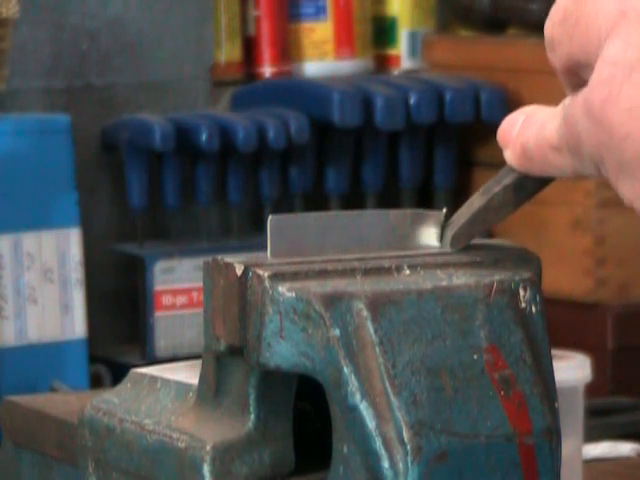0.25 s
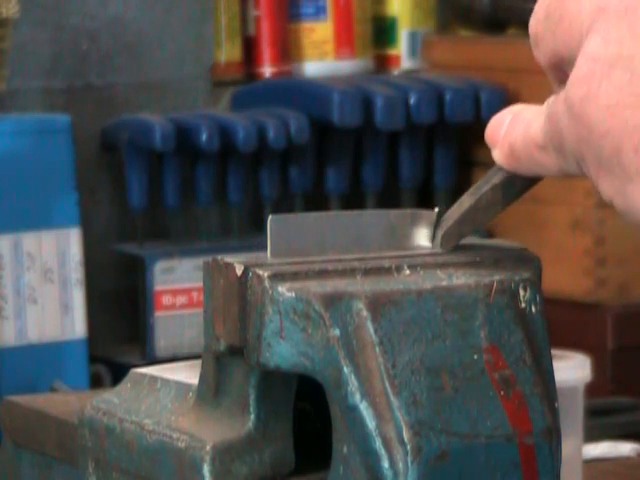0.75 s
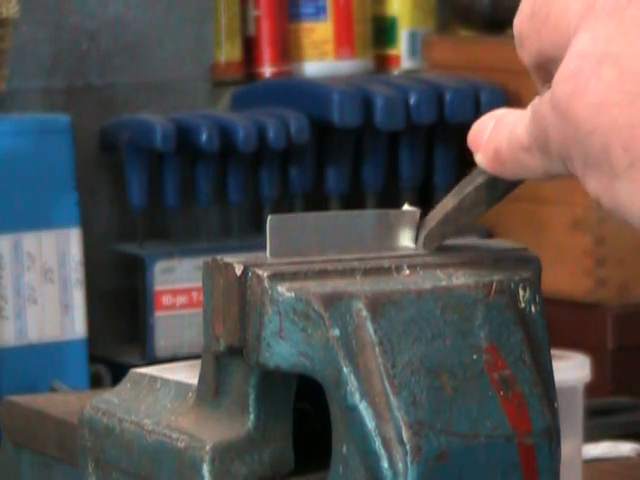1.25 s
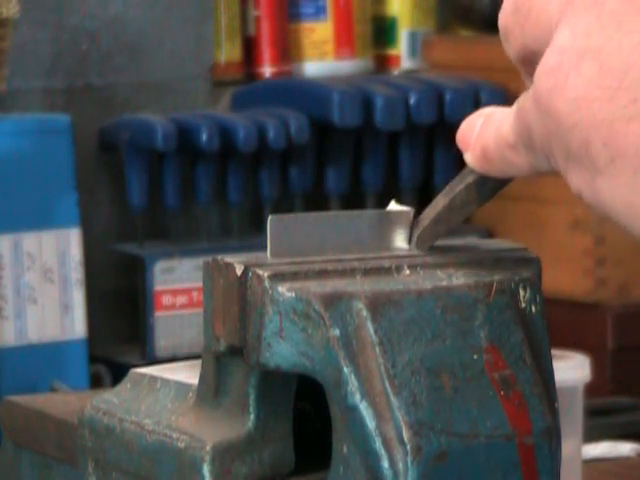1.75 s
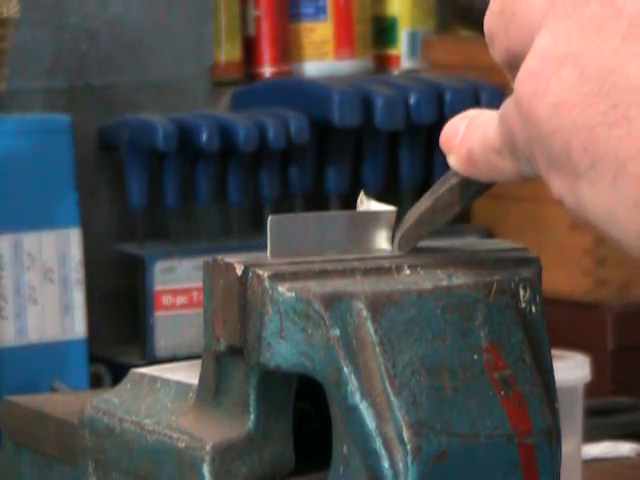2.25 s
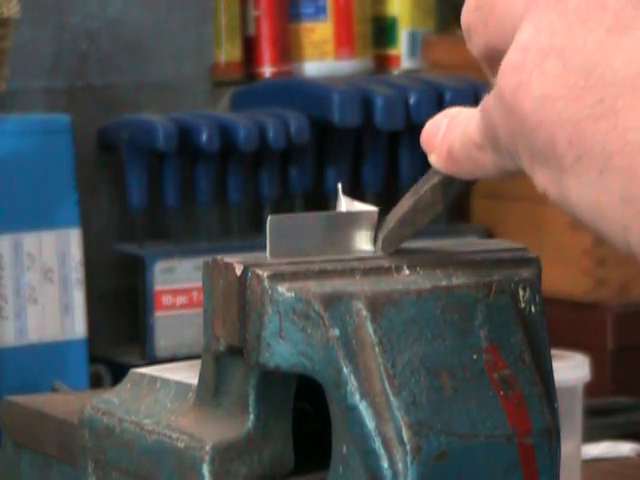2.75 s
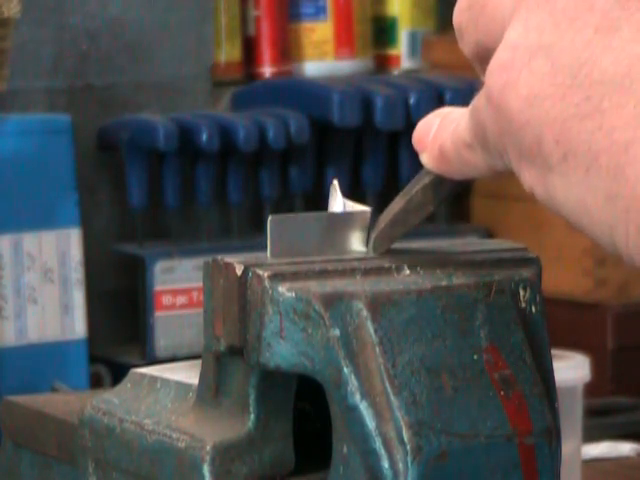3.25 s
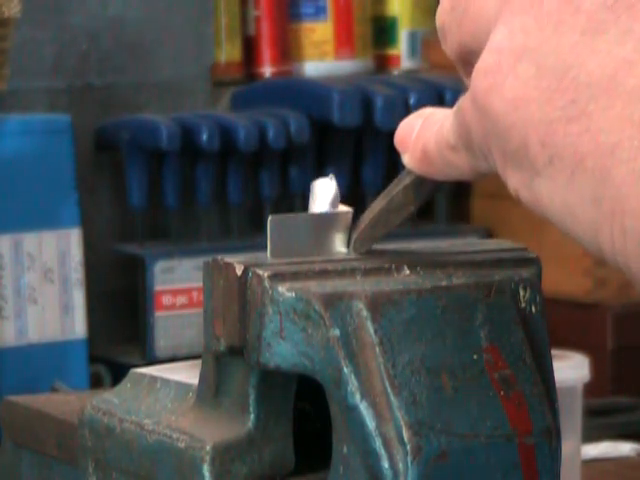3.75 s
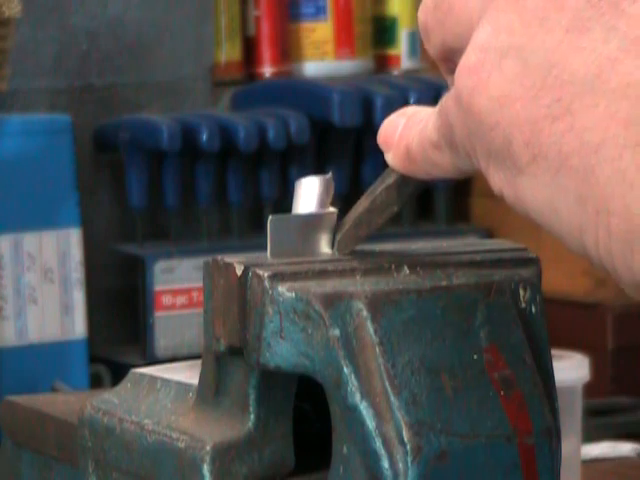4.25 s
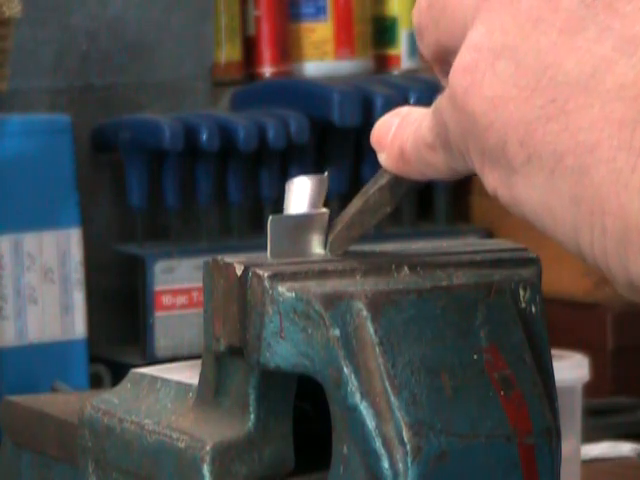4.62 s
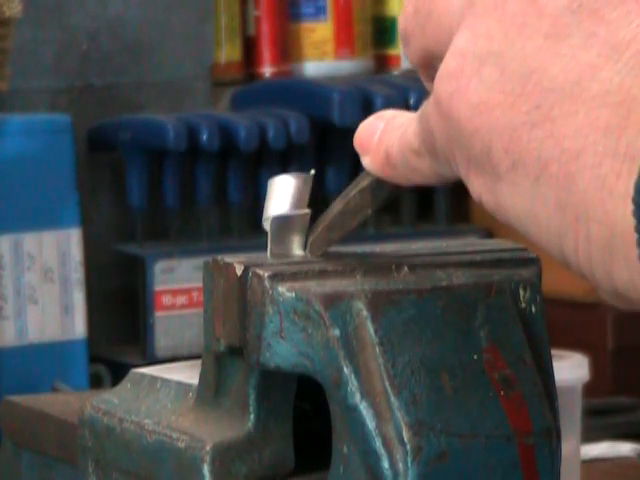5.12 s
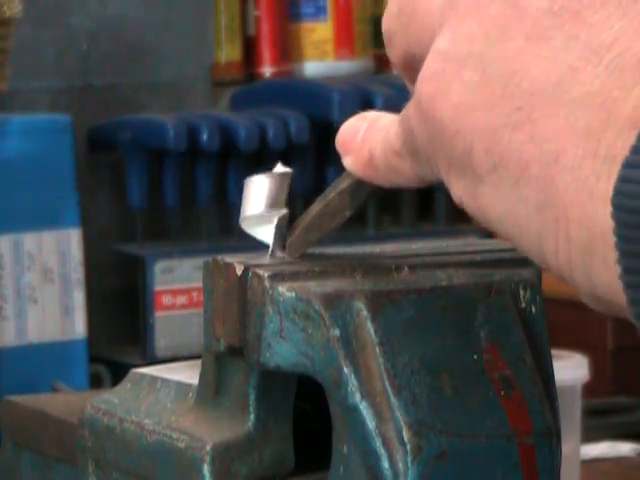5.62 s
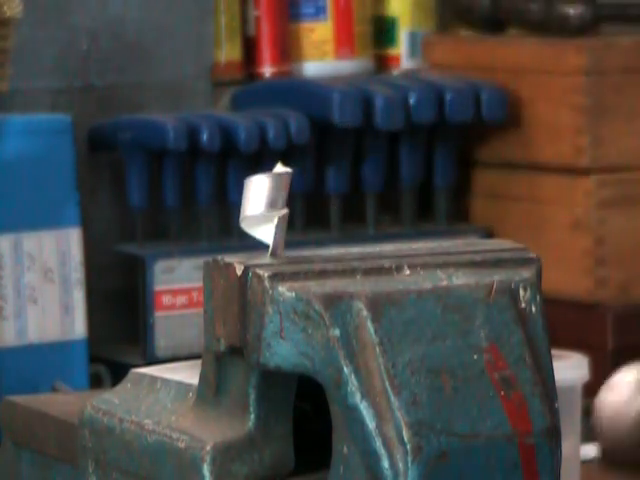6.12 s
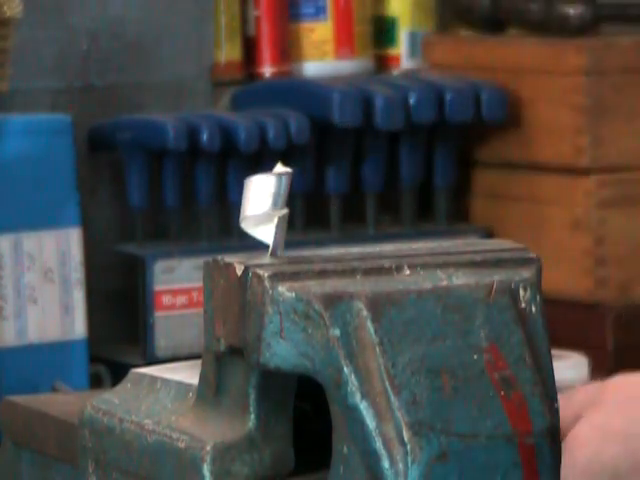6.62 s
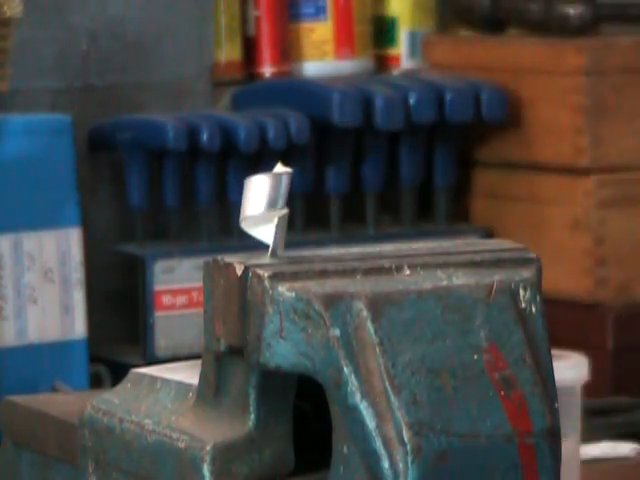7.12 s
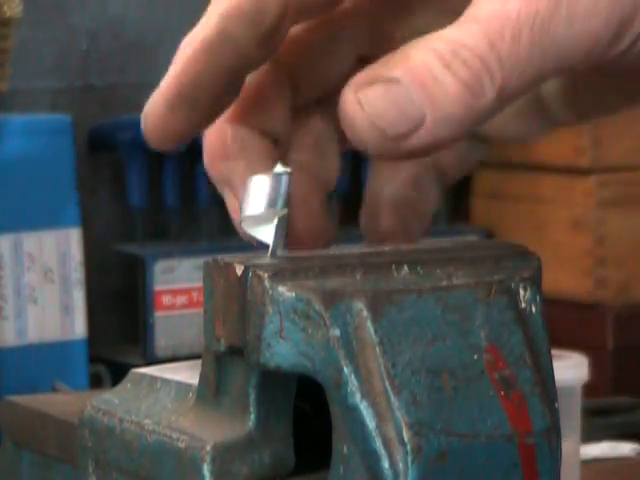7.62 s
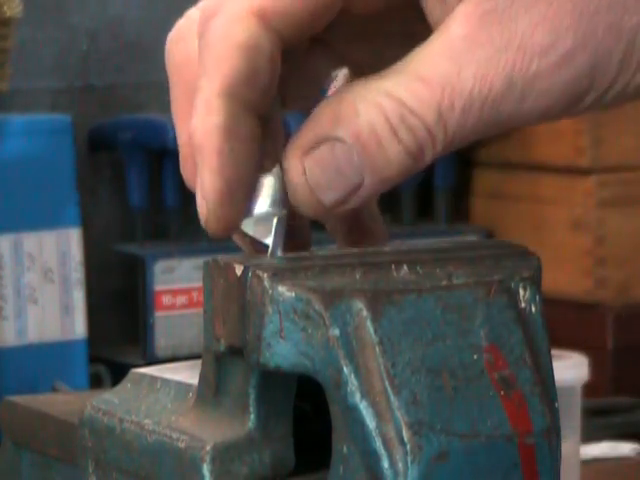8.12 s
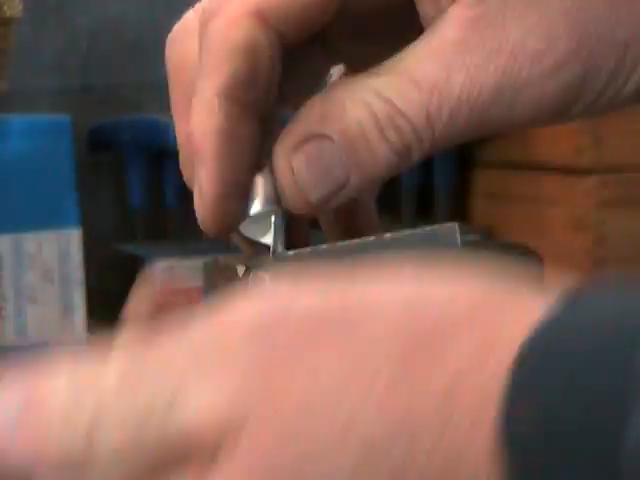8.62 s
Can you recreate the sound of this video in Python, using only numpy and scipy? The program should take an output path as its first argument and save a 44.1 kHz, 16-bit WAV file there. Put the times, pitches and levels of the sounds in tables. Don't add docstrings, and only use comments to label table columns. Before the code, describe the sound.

Steady ringing metal hammering in a small workshop, ending in a wooden clatter of dropped tools, a pause, and light clunks and ticks.

```python
import sys
import numpy as np
from scipy import signal
from scipy.fft import rfft, irfft, next_fast_len
from scipy.io import wavfile
from scipy.ndimage import uniform_filter1d

SR = 44100
rng = np.random.default_rng(int(sys.argv[2]) if len(sys.argv) > 2 else 0)


def natural_amplitude(level_db):
    exponent = np.asarray(level_db, float) / 20
    return 10 ** exponent


def unload_wav(signal):
    wavfile.write(
        sys.argv[1],
        SR,
        np.round(np.clip(np.atleast_2d(signal).T, -1, 1) * 32767).astype(np.int16),
    )


N = 391166


def evened(x):
    return x / np.sqrt(np.mean(x ** 2) + 1e-20)


def read(points, hz):
    f, value = np.transpose(points)
    return np.interp(np.log(hz + 1), np.log(f + 1), value)


def over_time(points, s):
    return np.interp(s, *np.transpose(points))


def add(mix, s, sound):
    part = mix[round(s * SR):][:len(sound)]
    part += sound[:len(part)]


def passed(x, order, hz, kind="low"):
    return signal.lfilter(*signal.butter(order, hz, kind, fs=SR), x)


def colour(x, points):
    hz = abs(np.fft.fftfreq(4096, 1 / SR))
    log_gain = np.log(natural_amplitude(np.maximum(read(points, hz), -100)))
    taps = np.fft.ifft(np.exp(np.conj(signal.hilbert(log_gain)))).real[:2048]
    return signal.oaconvolve(x, taps / np.linalg.norm(taps))[:len(x)]


def ring(modes, seconds, rise_s=0.000072, scatter_db=0., detune=0., sign=1):
    hz, db, t60 = np.transpose(modes)[:, :, None]
    t = np.arange(round(seconds * SR)) / SR
    loud, sharp = rng.standard_normal((2, len(modes), 1))
    decay = natural_amplitude(db + scatter_db * loud - 60 * t / t60)
    tones = decay * np.sin(2 * np.pi * hz * (1 + detune * sharp) * t)
    return sign ** np.arange(len(modes)) @ tones * (1 - np.exp(-t / rise_s))


def burst(t60, size=6000):
    return rng.standard_normal(size) * natural_amplitude(-60 * np.arange(size) / SR / t60)


def rattle(size=6000):
    return natural_amplitude(3. * evened(uniform_filter1d(rng.standard_normal(size), size=160)))


def knocks(events, body, body_db, low_hz, corner_hz, at_db, octaves):
    drive = np.zeros(N)
    for s, db, length in events:
        dull_hz = np.clip(corner_hz * 2 ** (octaves * (db - at_db) / 10), 100, 9000)
        give = np.minimum(np.arange(6000) / 90, 1)
        force = rattle() * burst(3.0 * length) * give
        grit = natural_amplitude(-33.0) * uniform_filter1d(force, size=3)
        puff = passed(force, 2, dull_hz) + grit
        add(drive, s, natural_amplitude(db - 3) * puff / abs(puff).max())
    drive = passed(drive, 2, low_hz, "high")
    rung = np.zeros(N)
    for hz, width, db in body:
        rung += natural_amplitude(db) * signal.lfilter(*signal.iirpeak(hz, hz / width, SR), drive)
    return drive + natural_amplitude(body_db) * rung


# (frequency [Hz], side minus mid [dB])
WIDTH = [(30, -3), (60, -21), (150, -18.5), (380, -20.5), (950, -16), (2380, -10), (5980, -7), (15000, 2.5)]


def sided(mid, other):
    size = next_fast_len(len(other))
    gain = natural_amplitude(read(WIDTH, np.fft.rfftfreq(size, 1 / SR)) + 1.0)
    side = irfft(rfft(other, size) * gain, size)[:len(other)]
    return np.array([mid + side, mid - side])


# (frequency [Hz], level [dB per Hz])
AIR_COLOUR = [(18, -44), (30, -5), (287, -1.5), (336, -3.5), (780, -4.5), (1540, -3.5), (2680, -9),
              (3060, -6), (3490, -12.5), (5450, -20), (8520, -28.5), (12000, -22.5), (16000, -48)]
# (frequency [Hz], level [dB per Hz])
RUSTLE_COLOUR = [(1470, -24.5), (2500, -7), (3310, -27), (3560, -0.5), (4500, 4), (5150, -0.5), (5770, 8),
                 (6400, 4.5), (7920, 3.5), (12400, -17.5), (13400, -23), (14000, -90.5)]
# (time [s], level [dB])
SLEEVE_MOVEMENT = [
    (0, -64.5),
    (5.1, -54.5),
    (5.5, -54),
    (6.4, -64),
    (6.9, -66.5),
    (7.45, -78.5),
    (7.95, -67),
    (8.499, -59),
    (8.87, -60.5),
]


def quiet():
    stir_db = over_time(SLEEVE_MOVEMENT, np.arange(N) / SR)
    air_db = -60 + 0.22 * (stir_db + 60)
    noise = rng.standard_normal((4, N))
    layers = []
    for k in range(2):
        air = natural_amplitude(air_db) * colour(noise[k], AIR_COLOUR)
        rustle = natural_amplitude(stir_db) * colour(noise[k + 2], RUSTLE_COLOUR)
        layers.append(air + rustle)
    return sided(*layers)


# (frequency [Hz], t60 [s])
ROOM_DECAY = [(100, 0.36), (260, 0.55), (700, 0.5), (1800, 0.48), (4800, 0.43), (8300, 0.39), (8900, 0.26),
              (10000, 0.31), (10800, .28), (15000, 0.3)]


def room(x):
    hz, t, z = signal.stft(rng.standard_normal((4, SR)), SR, nperseg=256)
    fading = z * natural_amplitude(-60 * t / read(ROOM_DECAY, hz)[:, None])
    tail = signal.istft(fading, SR, nperseg=256)[1]
    tail *= 1 - np.exp(-np.arange(tail.shape[1]) / SR / 0.0012)
    tail /= np.linalg.norm(tail[0])
    turn = np.pi / 2 * np.sin(2 * np.pi * .37 * np.arange(N) / SR)
    bass = signal.filtfilt(*signal.butter(2, 390, fs=SR), x)
    moving = x - bass
    first = signal.fftconvolve((bass + moving * np.cos(turn))[None], sided(*tail[:2]), axes=1)
    second = signal.fftconvolve((moving * np.sin(turn))[None], sided(*tail[2:]), axes=1)
    return (first + second)[:, :N]


# (delay [s], level [dB])
NEAR_ECHOES = [(.0037, -8), (.0062, -5.5), (.009, -33), (.0125, -16), (.018, -52)]


def early(x):
    taps = np.zeros((2, 2000))
    for k, (delay, db) in enumerate(NEAR_ECHOES):
        taps[k % 2, round(delay * SR)] = natural_amplitude(db)
        taps[1 - k % 2, round(delay * SR) + 1] = natural_amplitude(db)
    return signal.oaconvolve(x[None], taps, axes=1)[:, :N]


# (time [s], peak level [dB], main mode [Hz])
SHEET_TICKS = [
    (7.7889, -37, 6880),
    (8.2516, -48, 6640),
    (8.3345, -39, 11300),
    (8.362, -37, 7950),
    (8.367, -33.5, 10950),
    (8.371, -36, 6040),
    (8.478, -44, 8700),
    (8.4922, -32.5, 8470),
    (8.6024, -44, 6260),
]


def ticks():
    out = np.zeros(N)
    for s, db, hz in SHEET_TICKS:
        snap = passed(burst(0.038), 2, [3500, 11500], "band")
        modes = [(hz, 0, .04), (.52 * hz, -3, .06), (.71 * hz, -3, .05)]
        add(out, s, natural_amplitude(db + 0.5) * snap)
        add(out, s, natural_amplitude(db - 8) * ring(modes, .1))
    return out


# (time [s], peak level [dB], length [s])
HANDLE_KNOCKS = [
    (7.545, -46, 0.04),
    (7.628, -44.5, 0.059),
    (7.669, -40, 0.032),
    (7.69, -36.5, 0.029),
    (7.722, -33.5, 0.05),
    (7.787, -22, 0.041),
    (7.81, -41, 0.11),
    (8.189, -29, 0.03),
    (8.246, -27, 0.0254),
    (8.29, -40, 0.09),
]
# (time [s], peak level [dB], length [s])
HAND_NUDGES = [
    (7.05, -55, 0.09),
    (7.412, -45, 0.068),
    (7.495, -52, 0.0423),
    (7.585, -45.5, 0.029),
]
# (frequency [Hz], width [Hz], level [dB])
SCREW_BODY = [(150, 50, 4), (420, 110, 1), (700, 140, 3), (1100, 160, 4), (2020, 160, 14), (2320, 220, 6)]


def loosened_vise():
    handle = knocks(HANDLE_KNOCKS, SCREW_BODY, -0.5, 72, corner_hz=840, at_db=-36, octaves=0.66)
    nudges = knocks(HAND_NUDGES, SCREW_BODY[:1], 1.6, 86, corner_hz=260, at_db=-46.5, octaves=.05)
    return passed(handle, 2, 2480) + nudges


# (time [s], level [dB], sideways share [dB])
FREE_STRIKES = [
    (5.163, -54.5, 14.5),
    (6.288, -57, -10),
    (6.39, -54, -4),
    (6.447, -19, 3),
]
# (frequency [Hz], level [dB], t60 [s])
CHISEL_FREE_MODES = [(2950, -9, .33), (2968, -3, .33), (7425, -8, .2), (7436, 0, .27), (7437, -14, .9),
                     (7860, 1, .24), (12040, -30, .22), (13450, -15, .35), (14790, -26, .1)]


def free_chisel():
    out = np.zeros(N)
    for s, db, sideways_db in FREE_STRIKES:
        add(out, s, natural_amplitude(db + sideways_db) * ring(CHISEL_FREE_MODES[:2], 0.99, rise_s=0.0094))
        add(out, s, natural_amplitude(db) * ring(CHISEL_FREE_MODES[2:], 0.47, rise_s=0.00066))
    return out


# (time [s], peak level [dB], length [s])
HAMMER_LANDING = [
    (5.757, -19, 0.008),
    (5.765, -10, 0.01),
    (5.784, -12.5, 0.011),
    (5.827, -18.5, 0.054),
    (5.844, -5.5, 0.0089),
    (5.852, -7, 0.019),
    (5.89, -12, 0.016),
    (5.91, -18, 0.0094),
]
# (frequency [Hz], width [Hz], level [dB])
PLANK_BODY = [(260, 60, -4), (327, 67, -4), (460, 140, 6), (704, 27, 7.5), (3500, 550, 12.5)]
# (time [s], peak level [dB], length [s])
TOOL_CLATTER = [(6.0175, 2.5, 0.024), (6.024, -9, 0.0094), (6.035, -8.5, 0.023), (6.081, -3, 0.029),
                (6.12, -17, 0.037), (6.287, -14.5, 0.041), (6.311, -9.5, 0.024), (6.35, -11, 0.011),
                (6.385, -8.5, 0.0041), (6.42, -15.5, 0.07), (6.447, -13.5, 0.052), (6.484, -14.5, 0.041)]
# (frequency [Hz], width [Hz], level [dB])
WOOD_BODY = [(440, 84, 4), (669, 140, -0.5), (1100, 190, -5.5), (1250, 350, -5.5), (3030, 210, -8.5),
             (4350, 65, -16)]


def dropped_tools():
    hammer = knocks(HAMMER_LANDING, PLANK_BODY, 4.0, 73, corner_hz=626, at_db=1.5, octaves=.1)
    clatter = knocks(TOOL_CLATTER, WOOD_BODY, 5.4, 230, corner_hz=1420, at_db=-5.5, octaves=.2)
    return hammer + clatter


# (frequency [Hz], level [dB], t60 [s])
BENCH_MODES = [(79.4, -6.5, 0.53), (147.7, 17, 0.23), (162.8, 13.5, 0.3), (177.5, 3, 0.4),
               (209.6, -2.5, 0.67), (287.8, -1, 0.34), (300, -0.5, 0.69), (423, 4.5, 0.38),
               (640.4, -2, 0.36)]


def bench_thud():
    return ring(BENCH_MODES, .5, rise_s=.015, scatter_db=.7, sign=-1)


# (frequency [Hz], level [dB], t60 [s])
VISE_MODES = [(1674, -13, .4), (1922, -4, .4), (1937, 1, .48), (1950, 12, .06), (4237, -10, .5),
              (4260, 8, .03), (5800, -13, .4)]


def vise_ring():
    return ring(VISE_MODES, 1., scatter_db=1.)


def strip_clank(low_hz, high_hz):
    modes = [(low_hz, -7, .022), (high_hz, 2.5, .013), (1.2 * high_hz, -7, .016), (.86 * high_hz, -7, .016)]
    return ring(modes, .1)


# (frequency [Hz], level [dB], t60 [s])
CHISEL_HELD_MODES = [(3527, -5, 0.049), (4430, -15, 0.022), (5740, -19, 0.086), (6610, -7.5, 0.04),
                     (7660, 3.5, 0.037), (7950, -8, 0.11), (8110, 2, 0.028), (9400, -3.5, 0.023),
                     (12300, -4, 0.0085)]


def held_chisel():
    return ring(CHISEL_HELD_MODES, .1, rise_s=.0001, scatter_db=3., detune=.015)


# (frequency [Hz], level [dB], t60 [s])
CONTACT_MODES = [(7660, 9, 0.006), (9290, -8, 0.0018), (5170, -26.5, 0.002)]


def head_contact():
    return ring(CONTACT_MODES, .02, scatter_db=2.)


# (time [s], peak level [dB], low strip mode [Hz], high strip mode [Hz])
HAMMER_BLOWS = [(0.0275, -10.5, 3170, 5100), (0.3723, -10.5, 4180, 5270), (0.6983, -10.5, 2670, 5080),
                (1.0277, -11, 2760, 5000), (1.3453, -10.5, 4610, 5380), (1.6396, -10.5, 4140, 5100),
                (1.9219, -12, 2650, 4940), (2.2043, -8.5, 2740, 5000), (2.4822, -11, 4130, 4900),
                (2.7593, -10, 2930, 4870), (3.0369, -8.5, 2750, 5170), (3.3104, -8.5, 2310, 4800),
                (3.5816, -8, 2780, 4950), (3.8539, -8.5, 2810, 4900), (4.124, -8.5, 3800, 5010),
                (4.3962, -11, 3700, 5000), (4.6751, -10, 3420, 5660), (4.9436, -9.5, 3320, 5440)]
# (time [s], bearing [0-1])
JAW_BEARING = [
    (0, .15),
    (2.25, 0),
    (2.75, 0.97),
    (4.7, 1.01),
    (5, 0.45),
]
# (frequency [Hz], level [dB per Hz])
CRACK_COLOUR = [(120, -78.5), (200, -62), (1110, -8), (2330, -12), (5160, -1), (6550, -4.5), (7740, -6),
                (10000, -0.5), (10600, -23.5), (15300, -23), (16500, -58.5)]
# (frequency [Hz], level [dB])
ROOM_FILL_COLOUR = [(24, -102.5), (40, -24.5), (63, -22.5), (160, 1), (233, -9.5), (300, -4), (367, -7.5),
                    (438, -6.5), (933, -9.5), (1990, -13.5), (2140, -13.5), (5050, -16.5), (9970, -20),
                    (14200, -69.5), (16500, -104)]


def blows():
    crack, near, low, fill, far, sheen = np.zeros((6, N))
    for s, db, low_hz, high_hz in HAMMER_BLOWS:
        bearing = over_time(JAW_BEARING, s)
        vise_db = -16.5 + 19 * bearing
        sheen_db = -19 + 11 * bearing
        steel, vise = held_chisel(), vise_ring()
        push = np.r_[1, 0.061 * burst(.007)]
        add(crack, s, natural_amplitude(db + 14.5) * burst(0.019))
        add(sheen, s, natural_amplitude(db + sheen_db) * burst(.07))
        add(fill, s, natural_amplitude(db + 31) * push)
        add(near, s, natural_amplitude(db + 2) * steel)
        add(near, s, natural_amplitude(db + 12.5) * head_contact())
        add(low, s, natural_amplitude(db - 14.5) * bench_thud())
        add(low, s, natural_amplitude(db + vise_db - 19) * vise)
        add(far, s, natural_amplitude(db - 10.5) * steel)
        add(far, s, natural_amplitude(db + 6) * strip_clank(low_hz, high_hz))
        add(far, s, natural_amplitude(db + vise_db - 19.5) * vise)
    sheen = passed(sheen, 2, [12800, 15000], "band")
    direct = near + colour(crack, CRACK_COLOUR) + sheen
    room_feed = far + colour(fill, ROOM_FILL_COLOUR) + natural_amplitude(4.5) * sheen
    return direct, low, room_feed


def scene():
    near, low, far = blows()
    dropped = dropped_tools() + free_chisel()
    handled = loosened_vise()
    ticked = ticks()
    wet = room(natural_amplitude(-3.0) * far + natural_amplitude(-3.5) * dropped + natural_amplitude(-2.5) * handled + natural_amplitude(-10.5) * ticked)
    echoes = early(near + 0.71 * (dropped + handled))
    return near + low + dropped + handled + ticked + echoes + wet + quiet()


def top_cut(x):
    return signal.sosfilt(signal.butter(12, 16800, fs=SR, output="sos"), x)


def record(dry):
    keep = np.exp(-1 / (0.0075 * SR))
    power = signal.lfilter([1 - keep], [1, -keep], (dry ** 2).mean(0))
    power_db = 10 * np.log10(power + 1e-12)
    age = np.arange(N) / SR / 0.11
    over = np.log(np.maximum(power_db + 20, 1e-3))
    over_db = np.exp(np.maximum.accumulate(over + age) - age)
    late_db = np.roll(over_db, 50)
    clipped = .52 * np.tanh(dry / natural_amplitude(.75 * late_db) / .52)
    treble = passed(clipped, 1, 3000, "high")
    leaning = clipped + treble * np.array([[-.05], [.25]])
    capsule = signal.sosfilt(signal.butter(2, [55, 14500], "band", fs=SR, output="sos"), leaning)
    banded = signal.oaconvolve(capsule, signal.firwin(63, 15900, fs=SR)[None], "same")
    return top_cut(banded)


dry = scene()
out = record(dry)
unload_wav(out)
```